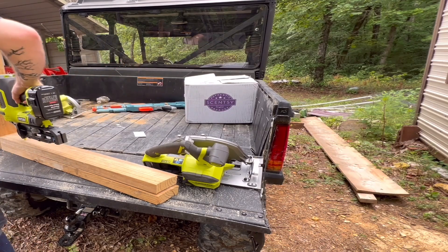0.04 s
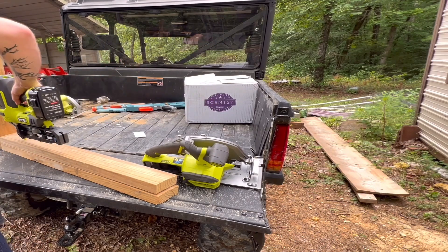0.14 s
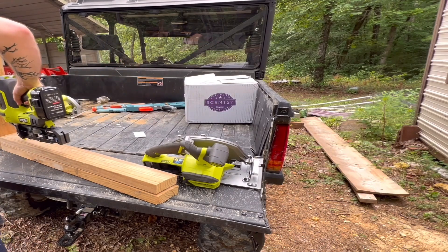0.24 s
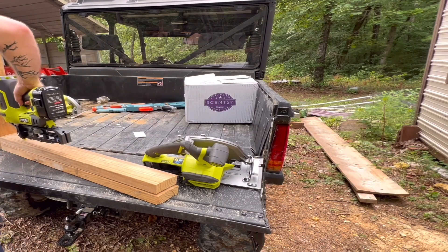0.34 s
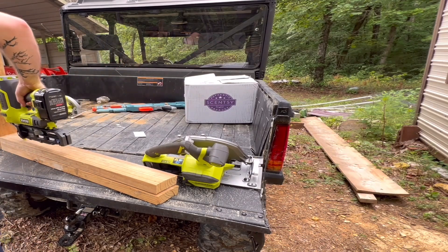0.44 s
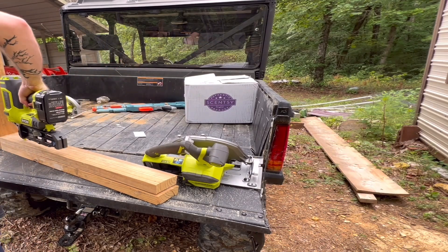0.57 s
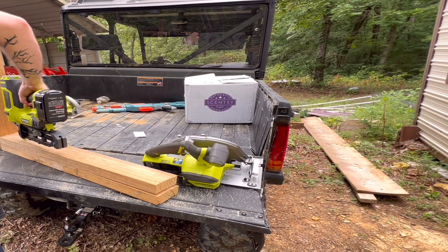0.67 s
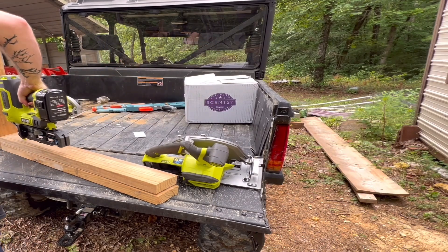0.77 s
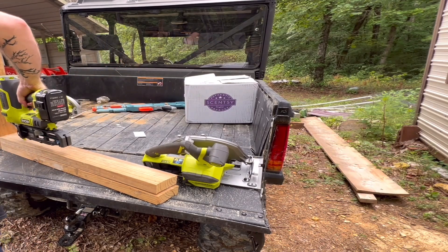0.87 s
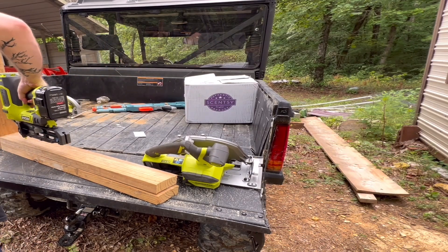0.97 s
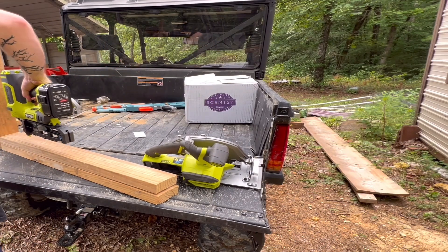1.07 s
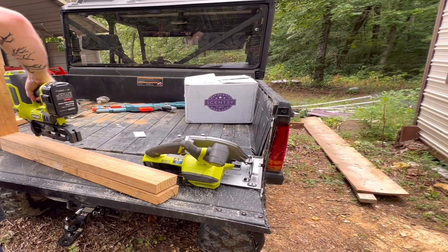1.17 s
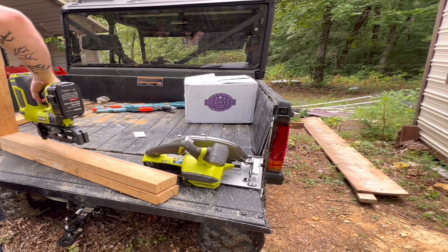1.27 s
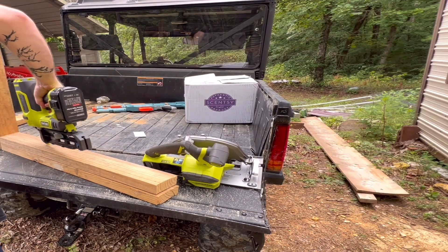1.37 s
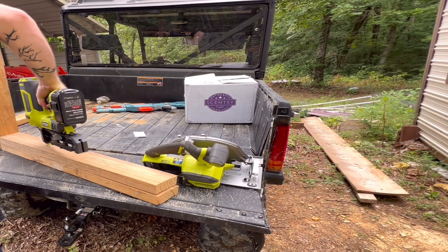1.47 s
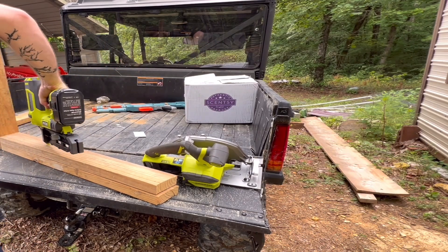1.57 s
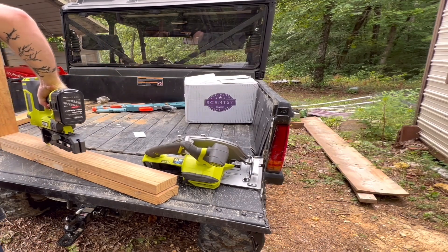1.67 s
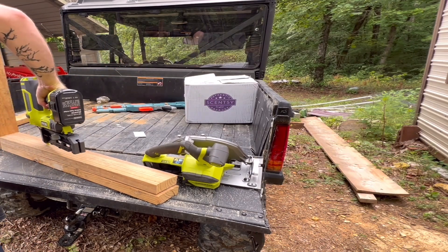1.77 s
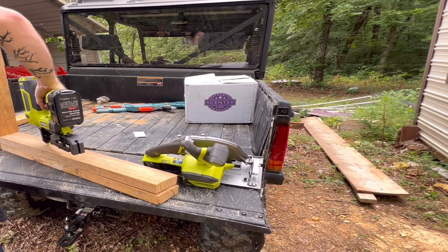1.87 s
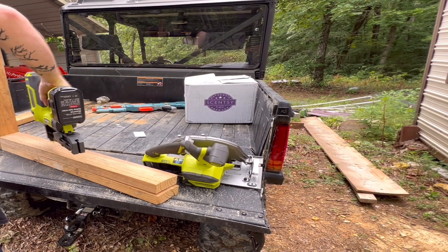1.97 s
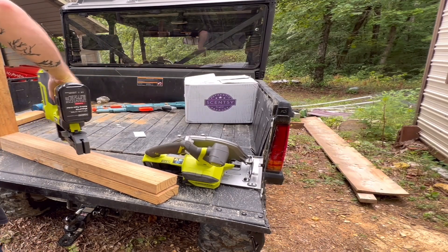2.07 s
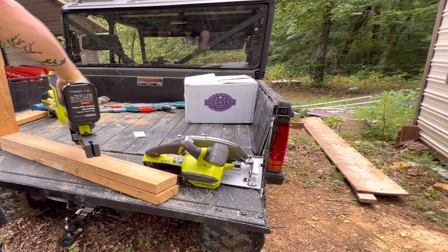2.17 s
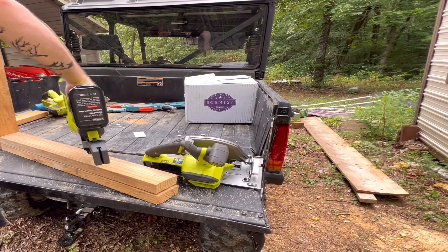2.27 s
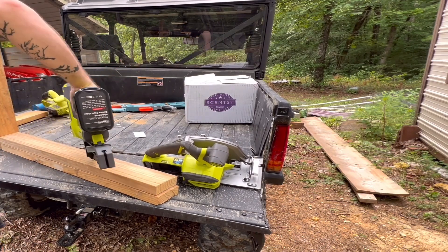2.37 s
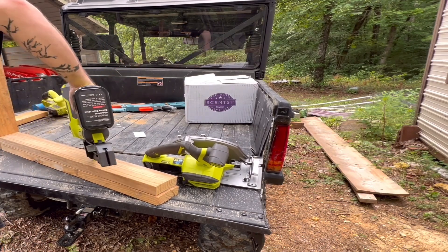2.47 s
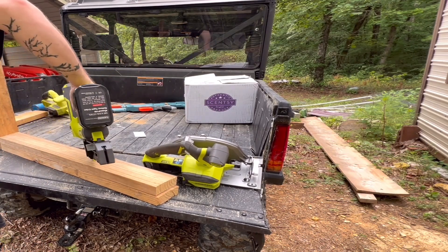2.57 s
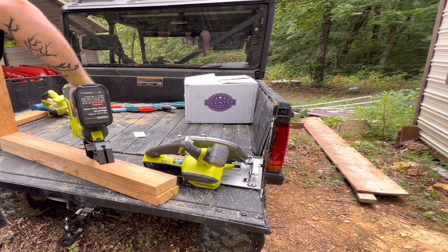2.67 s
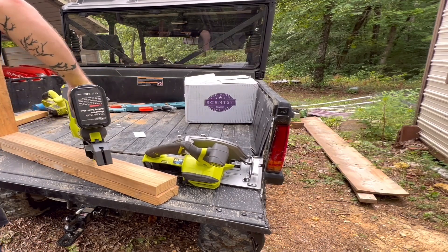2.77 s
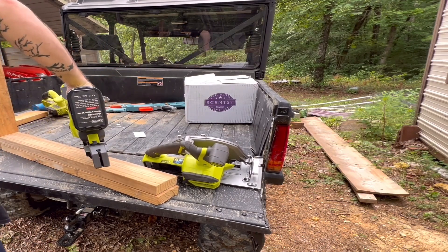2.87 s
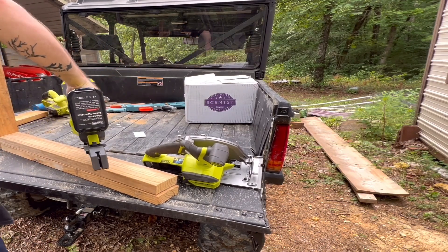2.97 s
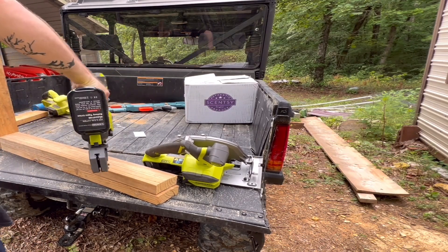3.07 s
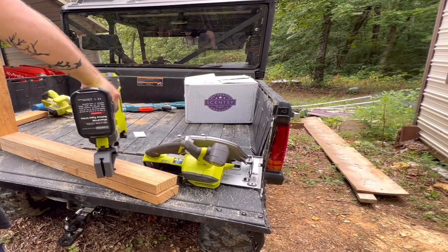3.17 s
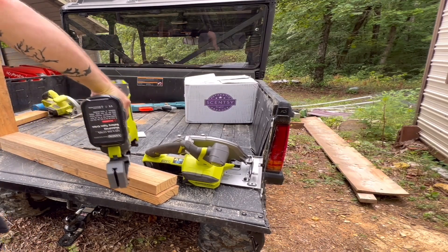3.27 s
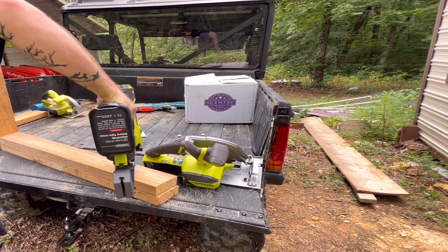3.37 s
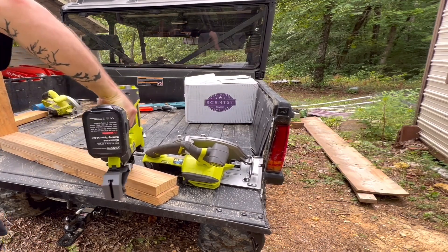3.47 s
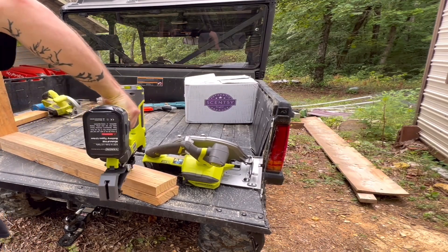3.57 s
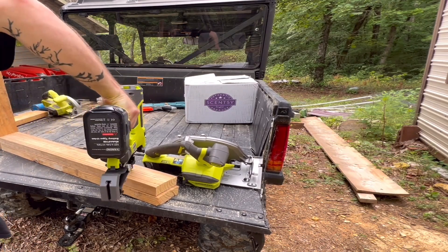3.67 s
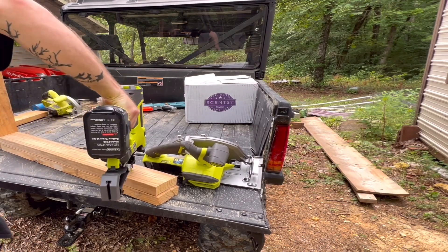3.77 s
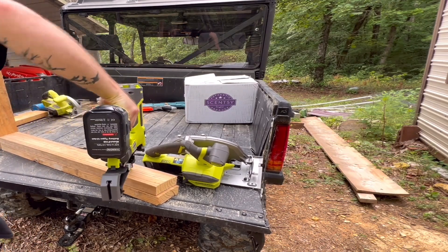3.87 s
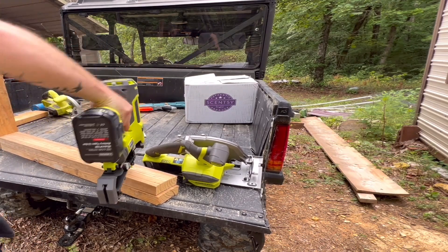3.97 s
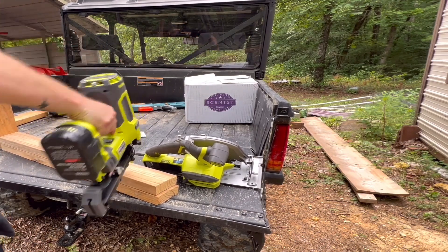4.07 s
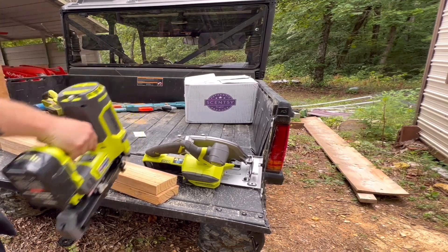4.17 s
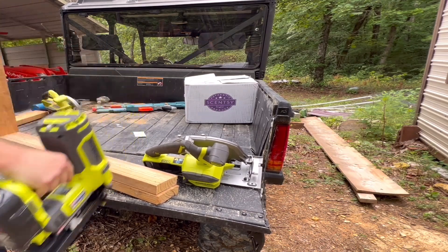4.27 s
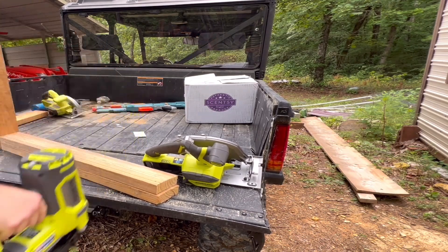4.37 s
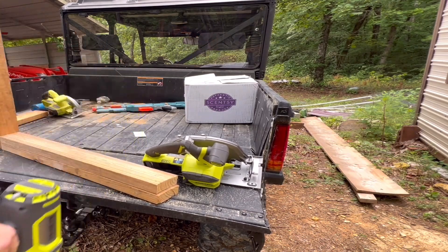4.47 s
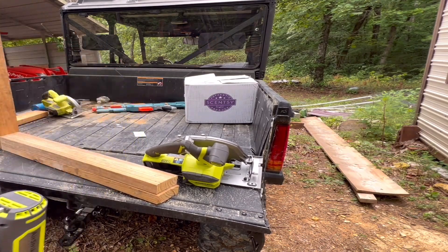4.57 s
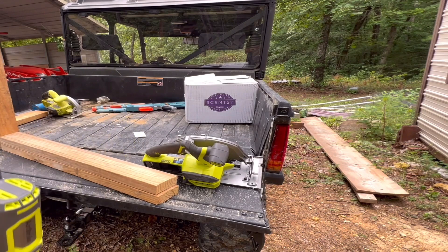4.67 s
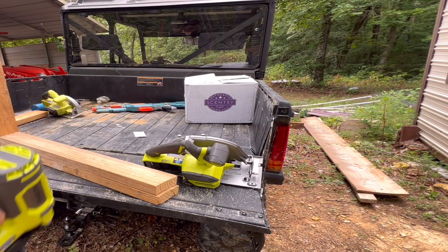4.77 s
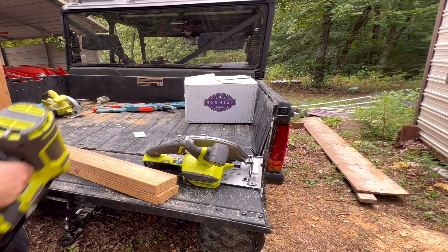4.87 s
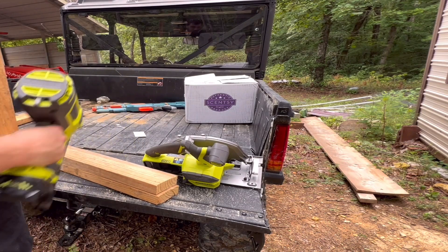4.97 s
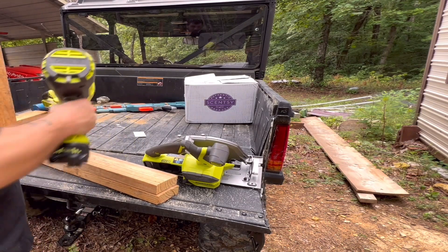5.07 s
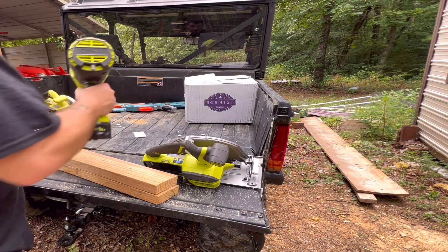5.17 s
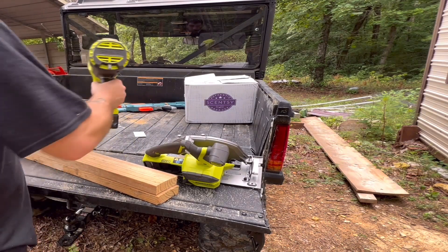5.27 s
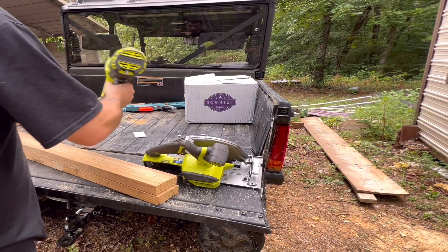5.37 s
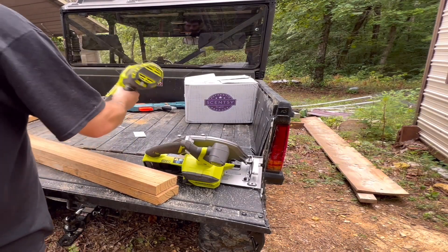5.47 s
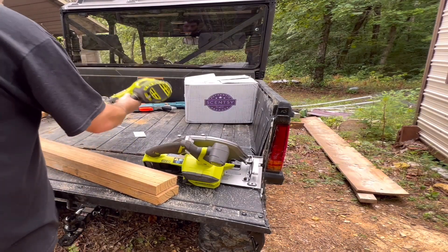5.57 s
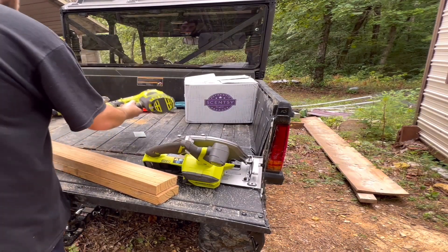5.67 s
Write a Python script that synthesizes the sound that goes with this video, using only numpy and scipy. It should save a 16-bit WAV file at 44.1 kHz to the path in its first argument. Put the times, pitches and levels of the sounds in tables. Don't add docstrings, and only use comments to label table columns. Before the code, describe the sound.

Four nailer cycles, slightly left, roughly one second apart: click, grinding electric whine for a fifth of a second, violent dry snap into wood, light motor run-back, plastic clack. Woody thuds and rattles mark the tool being repositioned. Short scattered reflections come from the truck bed and a wall. Afterward come only tiny handling clacks over insect hiss and distant rumble.

```python
import sys
import numpy as np
from scipy import signal
from scipy.fft import rfft, irfft, next_fast_len
from scipy.io import wavfile
from scipy.ndimage import uniform_filter1d, map_coordinates

SR = 44100
rng = np.random.default_rng(int(sys.argv[2]) if len(sys.argv) > 2 else 0)


def nominal_scale(level):
    x = np.asarray(level, float) / 20
    return 10 ** x


def to_wav(s):
    ch = np.atleast_2d(s).T
    pcm = np.round(np.clip(ch, -1, 1) * 32767)
    wavfile.write(sys.argv[1], SR, pcm.astype(np.int16))


N = 252470

# start_s, peak_db, steel_ring_db, tailgate_boom_db, rattle_db
SHOTS = [
    (0.767, -8, -34, -25.5, -24),
    (1.7477, -8.5, -42, -17.5, -15.5),
    (2.804, -7.5, -45.5, -16.5, -9.5),
    (3.7089, -8, -42, -24.5, -16.5),
]
START_S, STOP_S = -.2283, .263


def level(x, db):
    return x * nominal_scale(db) / np.sqrt(np.mean(x ** 2))


def colour(x, points):
    n = next_fast_len(x.shape[-1] + SR // 10)
    hz, db = np.transpose(points)
    gain = nominal_scale(np.interp(np.log(np.fft.rfftfreq(n, 1 / SR) + 1), np.log(hz), db))
    return irfft(rfft(x, n) * gain, n)[..., :x.shape[-1]]


def band(x, hz, width_hz):
    return signal.lfilter(*signal.iirpeak(min(hz, SR / 2.2), hz / width_hz, fs=SR), x)


def walk(rate_hz, size=N):
    hold = int(SR / rate_hz)
    steps = np.repeat(rng.standard_normal(size // hold + 1), hold)
    return 1.25 * uniform_filter1d(steps, hold)[:size]


def ring(push, modes):
    out = 0
    for hz, db, t60_s in modes:
        pole = np.exp(2j * np.pi * hz / SR - np.log(1000) / (t60_s * SR))
        out = out + nominal_scale(db) * signal.lfilter([1], [1, -pole], push).imag
    return out


def burst(spread_s, t60_s, size=SR // 4):
    t = np.arange(size) / SR
    decay = nominal_scale(-60 * np.maximum(t - spread_s, 0) / t60_s)
    return rng.standard_normal(size) * np.minimum(t * 3000, 1) * decay


def add(out, start_s, x, peak_db):
    i = int(start_s * SR)
    out[i:i + len(x)] += (x * nominal_scale(peak_db) / np.abs(x).max())[:N - i]


def yard():
    # start_s, level_db
    gain = [(0, 12), (1.35, 13), (1.9, 5.5), (2.2, -1.5), (4.15, 0), (5.72, 4)]
    # start_s, level_db
    breeze = [(0, -1), (.45, -0.5), (1.3, 3), (1.9, 6.5), (2.501, 4.5), (3.2, 7), (4.15, 4), (4.501, -2),
              (4.85, -3), (5.05, -2.5), (5.3, -7), (5.6, -5.5)]
    # start_s, level_db
    chorus = [(0, -35), (.45, 2), (1.33, -8), (2.199, -4), (4.598, -12), (4.78, -9), (5.3, 1.5), (5.72, -2)]
    # freq_hz, level_db
    air_spectrum = [(76, -19.5), (130, -5.5), (230, -11), (700, -10), (1700, -17.5), (2500, -22),
                    (4500, -19.5), (7000, -17), (9000, -23), (10500, -39.5), (12000, -67.5)]
    t = np.arange(N) / SR
    gain_db, breeze_db, chorus_db = (np.interp(t, *np.transpose(c)) for c in (gain, breeze, chorus))
    noise = rng.standard_normal((4, 2, N))
    high = colour(noise[0], [(6500, -42.5), (7500, -9.5), (8050, -2.5), (8500, -11.5), (9500, -49.5)])
    low = colour(noise[1], [(3500, -46.5), (4750, -6.5), (5050, -2), (5400, -14), (6500, -9),
                            (7500, -34.5), (9000, -51.5)])
    shared = noise[2, 0] + .22 * noise[2, ::-1] * [[1], [-1]]
    rumble = colour(shared, [(20, -24), (35, -7), (60, 2), (100, -11.5), (200, -14.5),
                             (400, -31.5), (2000, -67.5)])
    air = colour(noise[3], air_spectrum)
    mix = level(high, -76.5) * nominal_scale(walk(20.0))
    mix += level(low, -75) * nominal_scale(chorus_db + .8 * walk(25))
    mix += level(rumble, -68.5) * nominal_scale(breeze_db + 0.6 * walk(7.4))
    mix += level(air, -70.5) * nominal_scale(0.97 * breeze_db + .5 * walk(4.7))
    return nominal_scale(gain_db) * mix


def echoes(x, count=23):
    t = np.arange(SR // 3) / SR
    out, hop = np.zeros((2, N + SR)), N // count + 1
    fade = np.hanning(2 * hop)
    near = nominal_scale(-22.0 - 60 * t / 0.039) * (t > .0007)
    far = nominal_scale(-40.5 - 60 * t / 0.32) * (t > .01)
    for k in range(count):
        paths = colour((near + far) * rng.standard_normal((2, len(t))),
                       [(40, -28.5), (110, -22.0), (400, 0), (4000, 3.5), (16000, 0.5)])
        piece = x[k * hop:(k + 2) * hop]
        wet = signal.fftconvolve((piece * fade[:len(piece)])[None], paths, axes=1)
        out[:, k * hop:k * hop + wet.shape[1]] += wet
    return out[:, :N]


def thud(out, start_s, peak_db, hz, t60_s, push_s):
    modes = [(hz, 0, t60_s), (.86 * hz, -9, .25 * t60_s), (1.3 * hz, -12, .4 * t60_s)]
    shove = burst(push_s, 0.0067)
    add(shove, 0, np.hanning(40), 8)
    add(out, start_s, ring(shove, modes), peak_db)


def clack(out, start_s, peak_db, hz, t60_s, push_s):
    shove = burst(push_s, 0.0083, size=SR // 8)
    shove[1] = 29.0
    modes = [(hz, 0, t60_s), (.76 * hz, -5, t60_s), (1.35 * hz, -5, .6 * t60_s), (2.1 * hz, -7, .4 * t60_s)]
    add(out, start_s, ring(shove, modes), peak_db)


def tick(out, start_s, peak_db, hz, t60_s, spread_s):
    add(out, start_s, band(burst(spread_s, t60_s, size=SR // 8), hz, 2 * hz), peak_db)


def rattle(out, start_s, peak_db, spread_s, t60_s, treble_db):
    jolts = nominal_scale(2.0 * walk(70, SR // 4))
    body = colour(jolts * burst(spread_s, t60_s), [(40, -12.0), (90, 6.5), (250, 17.5), (550, 3.5),
                                                   (1200, -4.5), (3000, -21.5), (16000, -52.0)])
    add(out, start_s, body, peak_db)
    treble = colour(jolts * burst(spread_s, .9 * t60_s),
                    [(300, -18.5), (900, 13.5), (3000, 2.0), (9000, -10), (16000, -20)])
    add(out, start_s, treble, peak_db + treble_db)


def handling_knocks(out):
    # start_s, peak_db, pitch_hz, t60_s
    thuds = [
        (1.349, -30.5, 314.5, 0.18),
        (2.33, -27.5, 323, 0.08),
        (2.386, -34.5, 216, 0.173),
        (3.336, -37.5, 304, 0.29),
        (3.388, -39.5, 142, 0.13),
    ]
    # start_s, peak_db, pitch_hz
    sways = [
        (1.38, -41, 57.7),
        (2.37, -40.5, 61.1),
        (2.88, -47, 60.6),
        (3.849, -51, 60),
    ]
    # start_s, peak_db, spread_s, t60_s, treble_db
    rattles = [
        (1.365, -41, 0.078, .2, -18.5),
        (2.331, -23.5, 0.021, 0.16, -9.5),
        (2.47, -51.5, .053, .1, -25.5),
        (3.334, -28.5, 0.011, .2, -17.5),
    ]
    # start_s, peak_db, pitch_hz, tick_db
    clacks = [(0.144, -38.5, 865, -68), (0.32, -42, 1400, -44.5), (.377, -41.5, 800, -39.5),
              (1.3448, -33, 1210, -20.5), (2.33, -21.5, 822, -56), (3.3031, -42, 1320, -30),
              (3.342, -32, 760, -58), (4.194, -49.5, 1725, -52), (4.2737, -54.5, 1273, -60),
              (4.4742, -51.5, 1253, -70), (4.589, -71, 1684, -59), (5.033, -55, 776, -75),
              (5.519, -62, 917, -52.5), (5.545, -58.5, 894, -59), (5.574, -52, 1627, -59),
              (5.595, -52.5, 1537, -53)]
    # start_s, peak_db
    ticks = [(0.0, -42.5), (0.0695, -53), (0.459, -56), (1.3436, -18.5), (2.3051, -34.5), (4.3994, -72),
             (4.9644, -69)]
    for row in thuds:
        thud(out, *row, .011)
    for s, db, hz in sways:
        push = burst(0.046, .04, size=SR // 2)
        add(out, s, ring(push, [(hz, 0, .3), (1.9 * hz, -4, .2)]), db)
    for row in rattles:
        rattle(out, *row)
    for s, db, hz, tick_db in clacks:
        clack(out, s, db, hz, .013, .007)
        rattle(out, s, db - 10, .01, .05, -1)
        tick(out, s, tick_db, 2900, 0.019, 0.0033)
    for s, db in ticks:
        tick(out, s, db, 4700, 0.04, 0.018)


def cycle_knocks(out):
    # trigger_tick_db, start_clack_db, start_thud_db, stop_clack_db, stop_thud_db
    knock_levels = [(-31, -16, -23.5, -23, -26), (-34.5, -15, -21.5, -34, -40.5),
                    (-43.5, -22, -32.5, -30.5, -38.5), (-42, -23, -30.5, -30.5, -34.5)]
    # start_thud_hz, slack_thud_hz, stop_thud_hz
    board_pitches = [(310, 201, 214), (276, 198, 217.6), (267.5, 238.5, 234.4), (253, 200, 235.6)]
    trigger_s, slack_s, rebound_s, settle_s = -.2615, -.214, 0.058, .286
    coast_s = .034
    for (s, blow_db, *_), knock_db, hz in zip(SHOTS, knock_levels, board_pitches):
        trigger_db, start_db, push_db, stop_db, settle_db = knock_db
        tick(out, s + trigger_s, trigger_db + 2.5, 4500, 0.017, .003)
        tick(out, s + trigger_s + .015, trigger_db - 1, 4500, 0.043, .01)
        rattle(out, s + START_S - .017, push_db - 6.5, .015, 0.028, -0.5)
        clack(out, s + START_S, start_db + 1, 1140, .035, .006)
        rattle(out, s + START_S, start_db - 15.5, .022, 0.034, 9)
        clack(out, s + slack_s, start_db - 5, 850, .025, .007)
        thud(out, s + START_S, push_db - 1, hz[0], 0.17, .01)
        thud(out, s + slack_s, push_db + 3, hz[1], .1, .006)
        rattle(out, s + rebound_s, blow_db - 31, 0.0027, 0.019, -1)
        tick(out, s + STOP_S, stop_db + 8, 4550, .02, .003)
        clack(out, s + STOP_S + .001, stop_db - 2, 1290, .03, .011)
        rattle(out, s + STOP_S + .006, stop_db - 10, coast_s - .01, .08, 4)
        clack(out, s + settle_s - .004, stop_db - 5, 1250, .025, .006)
        thud(out, s + settle_s + .003, settle_db + 1, hz[2], .22, .005)


def wind_up(shot_s, speed_hz, gears_db, rotor_db, hiss_db):
    load_db_per_s = 16.5, -11.5, -26, 31.5, 30
    spin_up_s, mesh_db, mesh_s, mesh_wait_s = .032, -17.5, .012, 0.013
    t = np.linspace(START_S + .004, -.007, 60)
    since = t - t[0]
    full_hz, shortfall_hz = speed_hz
    hz = full_hz - shortfall_hz * np.exp(-since / spin_up_s)
    mesh = mesh_db * np.exp(-np.maximum(since - mesh_wait_s, 0) / mesh_s)
    tones = [db + slope * (t - t.mean()) + mesh for db, slope in zip(gears_db, load_db_per_s)]
    return np.transpose([shot_s + t, hz, *tones, rotor_db + mesh / 2, hiss_db + 0 * t])


def run_back(shot_s, hiss_db, gears_db):
    return_s, start_hz, climb_hz_per_s, free_hz, ease_hz = .033, 118, 350, 165.3, 5
    t = np.linspace(return_s, STOP_S, 60)
    hz = free_hz - ease_hz * np.logaddexp(0, (free_hz - start_hz - climb_hz_per_s * (t - t[0])) / ease_hz)
    left = (STOP_S - t) / (STOP_S - return_s)
    shy_db = .35 * (free_hz - hz)
    tones = [db - rise_db * left - shy_db for db, rise_db in zip(gears_db, (3, 2, 14))]
    return np.transpose([shot_s + t, hz, *tones, hiss_db - 3 * left])


def stroke(out, table, orders):
    # rotor_speed_multiple, level_db
    rotor = [(1, -6), (2, -15.5), (3, -2), (4, -4), (5, -10), (22.55, -3.5)]
    # carrier_speed_multiple, over_hiss_db
    sidebands = [(8, -23), (10, -11.5), (12, -10.5), (28, -12.5), (41, -17.5)]
    # freq_hz, level_db
    hiss_spectrum = [(120, -10.5), (300, 9), (500, -4), (1100, 4), (1900, 3.5), (2500, 0.5), (3400, 2),
                     (4400, -1), (6500, 2), (16000, -5.5)]
    gear_ratio = .45
    s, *columns = np.transpose(table)
    i = int(s[0] * SR) + np.arange(SR // 3)
    size = len(i)
    hz, *tone_db, hiss_db = (np.interp(i / SR, s, c) for c in columns)
    turn = 2 * np.pi * np.cumsum(uniform_filter1d(hz, size=600)) / SR

    def tone(order, db):
        ragged = nominal_scale(db + 1.6 * walk(70, size) + 1.5 * walk(25, size))
        phase = order * turn + 7 * rng.random() + .35 * walk(50, size)
        return np.sqrt(2) * ragged * np.sin(phase)

    x = sum(tone(k, db - 2.0) for k, db in zip(orders, tone_db))
    if len(tone_db) > len(orders):
        x += sum(tone(k / gear_ratio, tone_db[-1] + db) for k, db in rotor)
        x += sum(tone(k, hiss_db + 6 + db) for k, db in sidebands)
    grit = rng.standard_normal(size) * nominal_scale(1.5 * walk(1500, size))
    throb = nominal_scale(.7 * walk(90, size)) * (1 + .2 * np.sin(turn / gear_ratio))
    x += nominal_scale(hiss_db) * level(colour(grit, hiss_spectrum), 8.36) * throb
    edges_s = np.minimum(i / SR - s[0], s[-1] + .004 - i / SR)
    out[i] += x * np.clip(edges_s / .003, 0, 1)


def motor_runs(out):
    wind_orders = 13, 14, 27, 40, 48
    back_orders = 2, 13, 40
    # full_hz, start_shortfall_hz
    speeds = [(138.4, 18.4), (139.9, 16), (140.5, 22), (140.4, 20)]
    # order13_db, order14_db, order27_db, order40_db, order48_db
    wind_gears = [(-36, -31.5, -27, -39.5, -42.5), (-30, -31, -39, -31, -58.5),
                  (-41, -47.5, -42, -48, -67.5), (-40, -48, -37.5, -39.5, -60.5)]
    # rotor_db, wind_up_hiss_db, return_hiss_db
    motor_levels = [(-38.5, -41, -53), (-43, -41, -55), (-50, -50, -52), (-45, -49, -52)]
    # order2_db, order13_db, order40_db
    back_gears = [(-52, -55, -47), (-53, -54, -60), (-53, -60, -59), (-57, -64, -52)]
    for (s, *_), speed_hz, wind_db, motor_db, back_db in zip(SHOTS, speeds, wind_gears, motor_levels, back_gears):
        rotor_db, wind_hiss_db, back_hiss_db = motor_db
        stroke(out, wind_up(s, speed_hz, wind_db, rotor_db, wind_hiss_db), wind_orders)
        stroke(out, run_back(s, back_hiss_db, back_db), back_orders)


def driver_blows(out):
    # delay_s, level_db
    blows = [(0, -9), (.0026, 3), (.006, 2), (.008, -2), (.017, -10.5), (0.023, -20)]
    # pitch_hz, level_db, t60_s
    board = [(163, -23, 0.02), (216, -4, 0.13), (323, -3.5, 0.058), (417, 9, 0.0077), (675, 3.5, 0.027),
             (736.3, 4, 0.03), (1037, 9, 0.012), (1334, 5, 0.033), (1690, 8, 0.02), (2463, 0.5, 0.029),
             (3070, -12, 0.0067)]
    # pitch_hz, width_hz, level_db
    steel = [(1730, 70, 0), (1795, 70, -3), (2550, 120, -12)]
    # pitch_hz, level_db, t60_s
    bed = [(55.3, -5.5, 0.083), (101.5, 6.5, .2), (177.3, 0, 0.27), (250.1, -2.5, 0.49)]
    crack_db = 2
    for s, db, steel_db, boom_db, rattle_db in SHOTS:
        release = ring(burst(0.0048, 0.0048), [(900, -10.5, .015), (650, -0.5, 0.021)])
        add(out, s - .005, release, db - 13.5)
        push = 0.015 * burst(0.0072, .008)
        for delay_s, blow_db in blows:
            add(push, delay_s, np.hanning(14), blow_db + 7)
        add(out, s, ring(push, board), db + 6.0)
        add(out, s + .0015, band(burst(.003, .005), 5000., 13000.), db + crack_db - 5)
        add(out, s + .005, band(burst(.0025, .005), 4000., 12000.), db + crack_db)
        shake = burst(.01, 1.8, size=SR)
        steel_ring = sum(nominal_scale(g) * band(shake, hz, width_hz) for hz, width_hz, g in steel)
        add(out, s + 0.0052, steel_ring, db + steel_db)
        add(out, s + 0.0009, ring(burst(0.011, 0.088), bed), db + boom_db)
        loose = colour(burst(0.033, 0.05), [(200, 20.0), (900, -6.5), (2000, -3.5), (7000, -5), (16000, -23)])
        add(out, s + 0.0053, loose, db + rattle_db)


def at_ports(tool):
    # start_s, right_late_ms, left_minus_right_db
    place = [(0, 0.19, 1.0), (2.1, 0.18, 2.5), (2.6, 0.086, 0.8), (3.099, 0.066, 1.5), (3.6, 0.0914, 1.5),
             (4.2, 0.07, 2.5), (5.7, 0.098, -2)]
    # freq_hz, left_minus_right_db
    ports = [(60, -4.4), (250, 1.6), (500, -1), (1000, 13.5), (2000, 3.5), (4500, 7), (8000, 5),
             (12000, -5)]
    s, late_ms, pan_db = np.transpose(place)
    i = np.arange(N)
    late = map_coordinates(tool, [i - np.interp(i / SR, s, late_ms) * SR / 1000], order=3)
    pan_db = np.interp(i / SR, s, pan_db)
    left = colour(tool, [(hz, db / 2) for hz, db in ports]) * nominal_scale(pan_db / 2)
    right = colour(late, [(hz, -db / 2) for hz, db in ports]) * nominal_scale(-pan_db / 2)
    return np.array([left, right])


def scene():
    tool = np.zeros(N)
    motor_runs(tool)
    driver_blows(tool)
    cycle_knocks(tool)
    handling_knocks(tool)
    return at_ports(tool) + echoes(tool) + yard()


def band_limit(x):
    return signal.sosfilt(signal.butter(12, 16970, fs=SR, output="sos"), x)


def record(dry):
    # freq_hz, level_db
    overall_colour = [(25, -10), (60, 0), (9400, 0), (10000, -13), (10700, -17), (11400, -4), (13100, -3),
                      (13700, -28), (14300, -28), (14800, -2), (15700, -5), (16300, -28), (16900, -80)]
    overloaded = np.tanh(1.082 * dry) / 0.91
    return band_limit(colour(overloaded, overall_colour))


dry = scene()
out = record(dry)
to_wav(out)
```